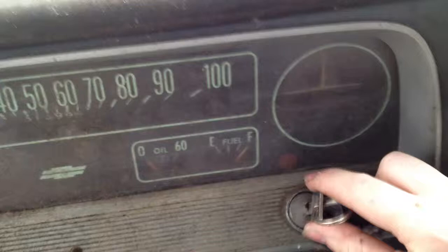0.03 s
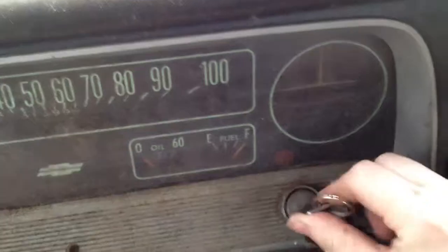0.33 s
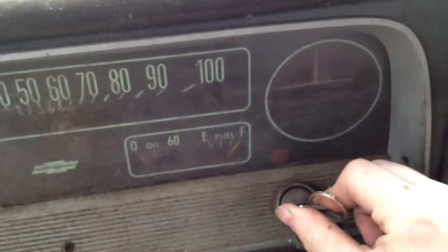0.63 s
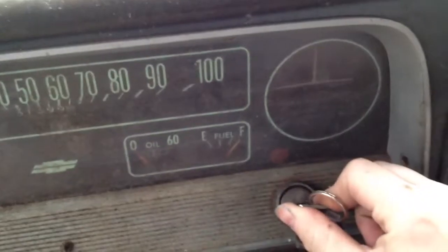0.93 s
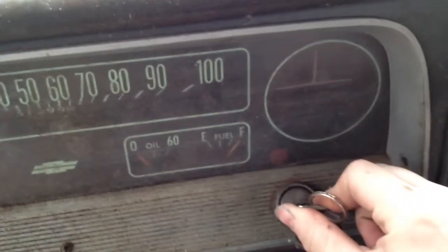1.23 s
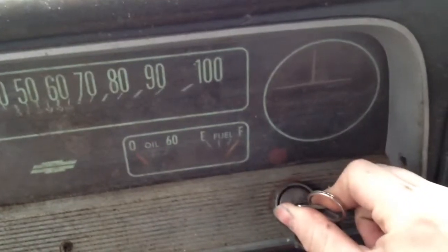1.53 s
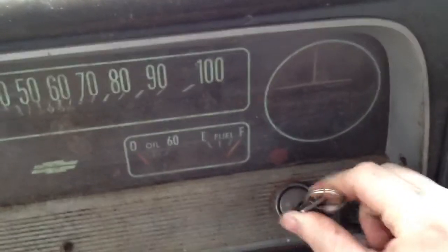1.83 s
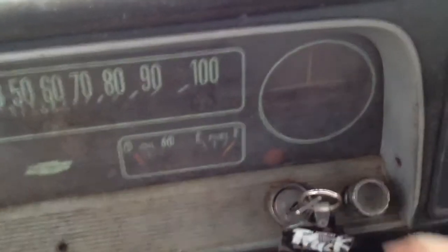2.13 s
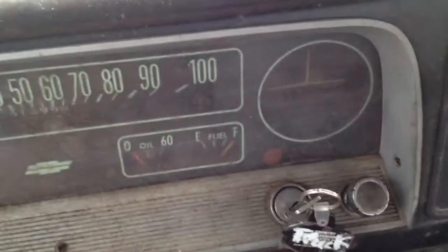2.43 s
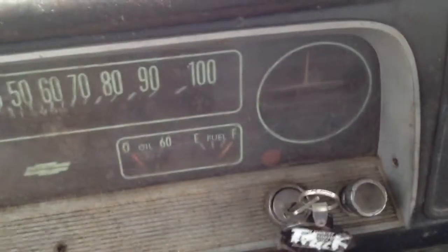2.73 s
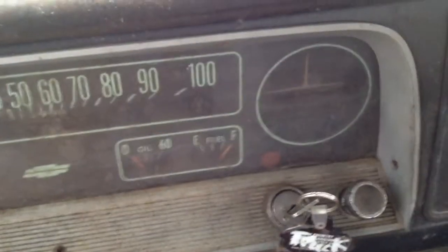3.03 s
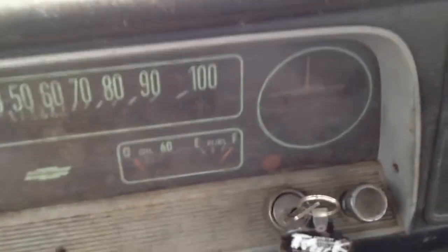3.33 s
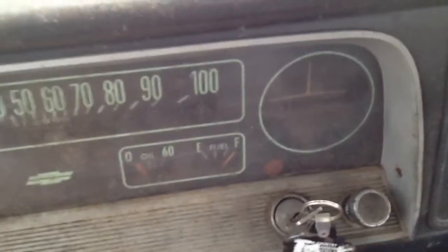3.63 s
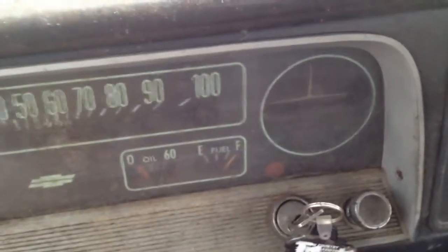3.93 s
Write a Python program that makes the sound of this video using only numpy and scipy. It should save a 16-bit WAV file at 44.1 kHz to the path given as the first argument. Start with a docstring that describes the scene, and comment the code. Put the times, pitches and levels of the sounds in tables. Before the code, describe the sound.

An old petrol pickup engine starts, heard from the driver's seat. A key clicks, the starter grinds briefly, then the engine catches, flares, sinks to a lumpy idle and is revved again with booming exhaust and metallic clatter.

```python
"""An ignition key clicks and an old petrol pickup starts, heard from the driver's seat.
The starter crashes into mesh and grinds against the compressions. The engine catches, flares,
sinks to a lumpy idle and is revved. Firings boom in the cab through exhaust and floor while
valve gear, fan and loose sheet metal clatter through the bulkhead."""
import sys
import numpy as np
from scipy import signal
from scipy.fft import rfft, irfft
from scipy.io import wavfile
from scipy.ndimage import uniform_filter1d

SR = 44100
rng = np.random.default_rng(int(sys.argv[2]) if len(sys.argv) > 2 else 0)


def unload_wav(signal):
    """Save mono or channel-first audio to the path in sys.argv[1] as 16-bit WAV at rate SR, clipped to [-1, 1]."""
    wavfile.write(
        sys.argv[1],
        SR,
        np.round(np.clip(np.atleast_2d(signal).T, -1, 1) * 32767).astype(np.int16),
    )


N = 176400
T = np.arange(N) / SR

# Lock clicks. Each row: start in seconds, relative level in dB, decay in seconds.
LOCK_CLICKS = [(0.12, -64, 0.011), (0.142, -52.5, 0.014), (0.177, -49, 0.011), (0.204, -50.5, 0.014),
               (.238, -23.5, 0.005), (0.245, -31.5, 0.024), (0.2755, -11.5, 0.00065), (0.282, -54, 0.0071),
               (0.447, -45, 0.021)]
# Key ring ticks. Each row: start in seconds, relative level in dB.
KEYRING_TICKS = [(.188, -53), (0.219, -41), (1.414, -18.5)]

# Starter speed. Each row: time in seconds, hum in Hz.
STARTER_HZ = [(.47, 149.3), (.56, 177.7), (.66, 199.1), (.74, 171.5), (.8, 205.1), (.87, 171.9),
              (.98, 195.6), (1.06, 178.2), (1.12, 191.2), (1.18, 172.3), (1.26, 192.2), (1.4, 181.5),
              (1.55, 193)]
# Starter hum. Each row: time in seconds, relative level in dB.
HUM_DB = [(0.47, -57), (0.498, -35), (0.53, -34.5), (0.744, -42.5), (0.764, -33), (0.882, -44),
          (0.992, -33), (1.078, -42), (1.184, -26.5), (1.218, -44.5), (1.246, -31), (1.302, -42),
          (1.5, -47.5)]
# Gear groan. Each row: multiple of the hum frequency, relative level in dB.
GROAN_PARTIALS = [(2, -4.5), (4, -11.5), (5, -6.5)]
# Compressions loading the gears. Each row: centre in seconds, hiss rise in dB.
COMPRESSIONS = [(.645, 6), (0.857, 8), (1.08, 6.5), (1.293, 12.5), (1.52, -0.5)]

# Engine speed. Each row: time in seconds, firing rate in Hz.
FIRING_HZ = [(1.4, 26.4), (1.7, 46.3), (1.85, 75.2), (1.97, 95), (2.1, 90.3), (2.2, 90), (2.3, 79),
             (2.45, 79), (2.6, 62.5), (3.1, 64.4), (3.2, 74.4), (3.3, 87.5), (3.38, 93.4), (3.46, 94),
             (3.55, 103), (3.66, 89), (3.76, 90), (3.86, 91.5), (3.95, 95), (4, 91)]
# Six cylinders. Each entry: strength at idle in dB.
CYLINDER_DB = [0, -13, 0, -12, 0, -14]
# Exhaust boom and floor rumble. Each row: time in seconds, relative level in dB.
BOOM_DB = [(1.65, -37.5), (1.67, -39.5), (1.87, -31.5), (1.99, -24.5), (2.04, -31), (2.11, -21.5),
           (2.21, -24), (2.34, -35), (2.4, -35), (2.74, -47), (3.12, -45.5), (3.17, -31), (3.37, -23.5),
           (3.49, -28.5), (3.59, -23.5), (3.62, -30.5), (4.0, -23)]
RUMBLE_DB = [(1.45, -51), (2.08, -28.5), (2.99, -56.5), (3.37, -21.5), (3.44, -28.5), (3.56, -22.5),
             (3.61, -28.5), (4.0, -30)]
# Exhaust surges. Each row: centre in seconds, peak in dB.
EXHAUST_THUMPS = [(1.984, -15.5), (3.383, -15), (3.52, -16), (3.574, -14), (3.93, -16)]
# Engine clatter. Each row: time in seconds, relative middle and treble levels in dB.
CLATTER_DB = [(1.45, -38.5, -39), (1.62, -37.5, -40), (1.8, -33.5, -32), (1.83, -33.5, -35.5),
              (1.92, -25.5, -23), (2.05, -30.5, -31), (2.07, -22, -25), (2.14, -37, -43.5),
              (2.55, -47.5, -48), (3.12, -49, -54), (3.14, -37, -33.5), (3.22, -34, -34),
              (3.25, -34, -34.5), (3.35, -25, -26.5), (3.47, -23.5, -22.5), (3.57, -31, -32),
              (3.87, -31, -34.5), (4.0, -26.5, -28.5)]
# Harder or weaker firings. Each row: centre in seconds, rise of the middle clatter in dB.
FIRING_SPUTTERS = [(1.75, 1), (1.787, 2.5), (1.907, -1.5), (3.22, 4), (3.365, 3), (3.635, 1.5), (3.71, 1.5),
                   (3.795, 2), (3.894, -3.5), (3.925, 1)]
# Sheet-metal modes. Each row: frequency in Hz, relative level in dB.
PANEL_MODES = [(802, 9.5), (1202, -6.5), (1261, 3.5), (1427, 0), (1790, 4.5), (2006, -2.5), (2278, -6),
               (2518, 7), (3834, -1), (4097, -1.5), (4339, 1.5)]

# Spectra of the sounding parts. Each row: frequency in Hz, relative density in dB.
LOCK_SPECTRUM = [(88, -27), (150, -30), (200, 1), (267, -10), (378, -11.5), (441, -16.5), (772, 0),
                 (866, -13), (2140, -4), (3150, -16), (7080, -12), (8410, -25), (13100, -31.5),
                 (15000, -46)]
KEYRING_SPECTRUM = [(2500, -34), (4200, -9), (6200, -10), (6950, 3), (7700, -11), (10000, -19),
                    (12500, -15), (15000, -22)]
GEAR_GROWL_SPECTRUM = [(200, -19.5), (290, 8.5), (360, 8), (450, -1.5), (540, 0), (680, 11), (930, 6),
                       (1100, 2), (1700, -33.5)]
GEAR_HISS_SPECTRUM = [(650, -26), (1100, -8), (1280, 5.5), (1390, -5), (1870, 4.5), (2090, -2.5),
                      (2500, 0.5), (2910, -12), (4690, -1), (5180, -10.5), (7470, -10), (9210, -23),
                      (13700, -52), (15500, -38)]
ENGINE_BAY_SPECTRUM = [(260, -26), (450, 0), (605, 3), (652, -3), (814, 6), (1050, -2), (1230, 2),
                       (1350, -0.5), (1410, 1.5), (1630, -1), (1810, 2.5), (2290, 3), (2780, -0.5),
                       (3470, -6.5), (4210, 0.5), (4960, -7), (7610, -7.5), (9790, -20.5), (13400, -18),
                       (15500, -29)]
EXHAUST_SPECTRUM = [(40, -66), (100, -36), (140, -12.5), (165, 5), (188, 5), (215, -2), (245, -2.5),
                    (290, -19), (340, -20), (450, -21), (900, -62.5)]
FLOOR_SPECTRUM = [(25, -65), (45, -26), (65, -14.5), (85, -18), (112, 0), (135, -9), (180, -23), (400, -52)]


def undb(db):
    return 10 ** (np.asarray(db) / 20)


def unit(x):
    return x / np.sqrt(np.mean(x ** 2))


def curve(rows, column=1):
    rows = np.array(rows)
    return np.interp(T, rows[:, 0], rows[:, column])


def bump(centre_s, width_s):
    return np.exp(-((T - centre_s) / width_s) ** 2)


def burst(start_s, decay_s):
    return (T >= start_s) * np.exp(-np.maximum(T - start_s, 0) / decay_s)


def fade(t60_s):
    return np.exp(-np.log(1000) * T / t60_s)


def noise():
    return rng.standard_normal(N)


def grit(spread_db):
    """Dense tiny impacts of uneven size."""
    return unit(noise() * undb(spread_db * np.minimum(rng.exponential(size=N), 6)))


def walk(rate_hz):
    """Smooth random drift, unit RMS."""
    size = int(SR / rate_hz)
    return unit(uniform_filter1d(uniform_filter1d(noise(), size), size))


def steady(x, size=2600):
    """Hold at unit level."""
    return x / np.sqrt(np.abs(uniform_filter1d(uniform_filter1d(x * x, size), size)) + 1e-12)


def convolve(x, response):
    """Filter at unit power gain."""
    return signal.fftconvolve(x, response / np.linalg.norm(response))[:N]


def colour(x, spectrum, size=8192):
    """Minimum-phase filter through (Hz, dB) points."""
    hz, db = np.array(spectrum).T
    gain_db = np.interp(np.log(np.fft.rfftfreq(size, 1 / SR) + 1), np.log(hz), db)
    cepstrum = irfft(np.log(undb(gain_db)))
    cepstrum[1:size // 2] *= 2
    cepstrum[size // 2 + 1:] = 0
    return convolve(x, irfft(np.exp(rfft(cepstrum))))


def cut(x, hz, kind, order=4):
    return signal.sosfilt(signal.butter(order, hz, kind, fs=SR, output="sos"), x)


def ring(x, modes, t60_s):
    """Excite damped (Hz, dB) modes."""
    return convolve(x, fade(t60_s) * sum(undb(db) * np.sin(2 * np.pi * hz * T) for hz, db in modes))


def cab(x, t60_s, wet_db):
    """Dense, short reflections off glass and painted steel."""
    tail = noise() * fade(t60_s) * (T > 0.002)
    return (x + undb(wet_db) * convolve(x, tail)) / np.hypot(1, undb(wet_db))


def air(start_s=0.118):
    """Faint, dull background noise."""
    spectrum = [(40, -21.5), (180, 3.5), (500, -8.5), (2000, -19), (7000, -33.5), (15000, -36)]
    return undb(-54) * colour(noise(), spectrum) * (T > start_s)


def key():
    """Lock wafers scrape and snap, shaking the dashboard; the key ring ticks."""
    snaps = noise() * sum(undb(db) * burst(s, decay_s) for s, db, decay_s in LOCK_CLICKS)
    lock = cab(colour(snaps, LOCK_SPECTRUM), t60_s=0.085, wet_db=0)
    dash = undb(-16) * ring(snaps, [(222, 0), (262, 3.5)], t60_s=0.28)
    dash += undb(-14) * ring(snaps, [(775, 0)], t60_s=0.14)
    ticks = noise() * sum(undb(db) * burst(s, decay_s=0.00088) for s, db in KEYRING_TICKS)
    keyring = cut(colour(ticks, KEYRING_SPECTRUM), 4300, "high", order=2)
    return cut(undb(2) * lock + dash, 160, "high") + undb(3.5) * cab(keyring, t60_s=0.11, wet_db=1)


def pinion(teeth, start_s=0.46, attack_s=0.031, hold_s=0.068, decay_s=0.034):
    """The pinion crashes into mesh and shakes the floor."""
    envelope = np.clip((T - start_s) / attack_s, 0, 1)
    envelope *= np.exp(-np.maximum(T - start_s - hold_s, 0) / decay_s)
    crash = unit(cut(colour(teeth * grit(spread_db=2.5), ENGINE_BAY_SPECTRUM), 350, "high"))
    zing = unit(ring(noise(), [(4450, 0)], t60_s=0.013))
    shake = steady(colour(noise(), FLOOR_SPECTRUM)) * (undb(-54.5) + undb(-38) * bump(0.565, 0.04))
    return envelope * (undb(-32.5) * crash + undb(-36.5) * zing) + shake


def starter():
    """The motor hums; its gears groan and grind against the compressions."""
    hum_hz = curve(STARTER_HZ) * (1 + 0.0227 * walk(72.5))
    phase = 2 * np.pi * np.cumsum(hum_hz) / SR
    hum = np.sin(phase) * undb(2 * walk(51)) + undb(-2.5) * unit(colour(noise(), EXHAUST_SPECTRUM))
    load_db = sum(db * bump(s, width_s=0.05) for s, db in COMPRESSIONS)
    teeth = np.exp(0.12 * np.cos(phase))
    groan = sum(undb(db + 2 * walk(32)) * np.sin(k * phase + 0.85 * walk(104))
                for k, db in GROAN_PARTIALS)
    growl = steady(unit(colour(teeth * noise(), GEAR_GROWL_SPECTRUM)) + groan)
    growl *= undb(-42 + 0.48 * load_db + walk(36))
    hiss = unit(cut(colour(teeth * grit(spread_db=1.5), GEAR_HISS_SPECTRUM), 860, "high"))
    hiss *= undb(-51.5 + load_db)
    return steady(hum) * undb(curve(HUM_DB) + 2) + growl + hiss + pinion(teeth)


def clatter(age_s, lump, scatter):
    """Each firing sprays metallic knocks; a large panel hums when the revs are up."""
    revs = 1.15 - lump
    spray = np.exp(-age_s / 0.0071) * undb(7.1 * np.tanh(scatter))
    knocks = grit(spread_db=2) * (1.06 + spray) * revs + 0.66 * noise()
    metal = unit(cab(colour(knocks, ENGINE_BAY_SPECTRUM), t60_s=0.076, wet_db=-6))
    metal += undb(-9) * unit(ring(knocks, PANEL_MODES, t60_s=0.24))
    panel_hum = undb(-11.5) * revs * steady(ring(knocks, [(385.6, 0)], t60_s=0.16))
    middle = steady(cut(metal, 2280, "low", order=6)) + panel_hum
    treble = steady(cut(metal, 2970, "high", order=6))
    sputter_db = sum(db * bump(s, width_s=0.022) for s, db in FIRING_SPUTTERS)
    middle *= undb(curve(CLATTER_DB) + sputter_db - 0.5)
    treble *= undb(curve(CLATTER_DB, column=2) + 1.76 * sputter_db)
    return middle + treble


def thumps(cab_hz=183.5):
    """Exhaust pressure surges boom at the cab resonance."""
    envelope = sum(undb(db) * bump(s, width_s=0.02) for s, db in EXHAUST_THUMPS)
    return envelope * np.sin(2 * np.pi * (cab_hz * T + rng.random()) + 0.33 * walk(39))


def exhaust(cycles, age_s, lump, strength):
    """Gas pulses drive exhaust and floor; off the throttle, a clean drone at the firing rate."""
    coast = bump(centre_s=2.19, width_s=0.11)
    pulses = np.diff(cycles.astype(int), prepend=0)
    puffs = (0.072 + 0.026 * lump) * (1 - 0.5 * coast) * np.exp(-age_s / 0.0081) * noise()
    gas = strength * (pulses + puffs)
    boom = steady(colour(gas, EXHAUST_SPECTRUM), size=2200) * undb(curve(BOOM_DB) + 1)
    rumble = steady(colour(gas + 0.057 * noise(), FLOOR_SPECTRUM)) * undb(curve(RUMBLE_DB))
    drone = undb(-30.5) * np.sqrt(2) * np.sin(2 * np.pi * cycles)
    return boom + (1 - 0.76 * coast) * rumble + coast * drone


def engine(idle_hz=65, smooth_hz=86.85, scatter_db=1.5):
    """Six unequal cylinders fire in turn: lumpy at idle, more even at speed."""
    lump = np.interp(curve(FIRING_HZ), [idle_hz, smooth_hz], [1, 0.18])
    rate_hz = curve(FIRING_HZ) * (1 + 0.066 * lump * walk(50))
    cycles = np.cumsum(rate_hz) / SR
    firing = cycles.astype(int)
    age_s = (cycles - firing) / rate_hz
    gas_scatter, knock_scatter = rng.standard_normal((N // 100, 2))[firing].T
    cylinder_db = np.array(CYLINDER_DB)[firing % len(CYLINDER_DB)]
    strength = undb(lump * cylinder_db + scatter_db * gas_scatter)
    return exhaust(cycles, age_s, lump, strength) + clatter(age_s, lump, knock_scatter) + thumps()


def scene(crank_s=0.4934, catch_s=1.553, handover_s=0.55):
    """Key, then starter, crossfaded into the engine as it catches."""
    engaged = np.clip((T - crank_s) / 0.022 + 1, 0, 1)
    handover = np.pi / 2 * np.clip((T - catch_s) / handover_s + 0.5, 0, 1)
    return (air() + key() + engaged * np.cos(handover) * starter() + np.sin(handover) * engine())[None]


def record(dry, bass_hz=41, top_hz=15500):
    """Thin the deep bass, cut the top."""
    lowpass = signal.ellip(10, 0.2, 80, top_hz, fs=SR, output="sos")
    return signal.sosfilt(lowpass, cut(dry, bass_hz, "high", order=2))


dry = scene()
out = record(dry)
unload_wav(out)
```